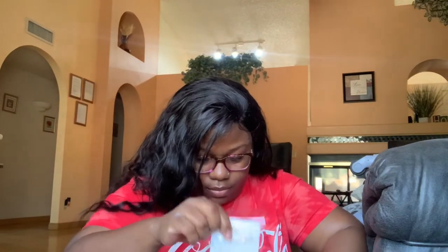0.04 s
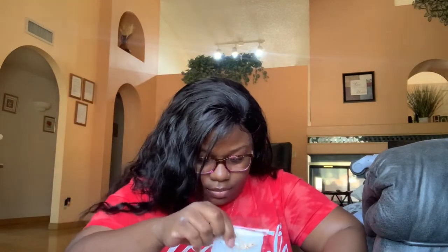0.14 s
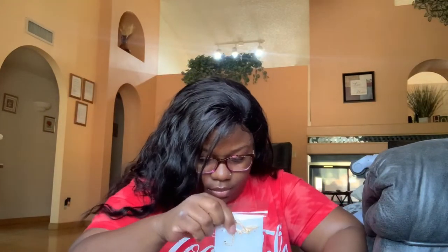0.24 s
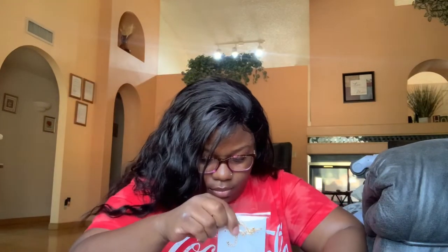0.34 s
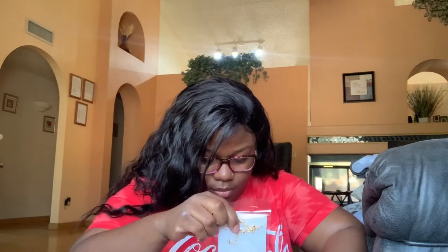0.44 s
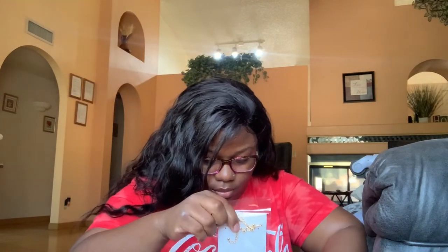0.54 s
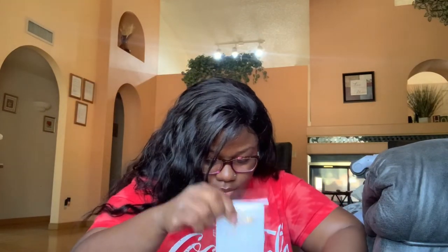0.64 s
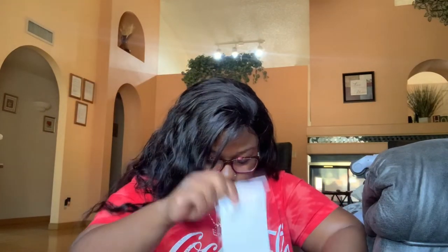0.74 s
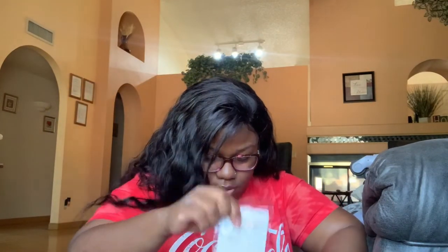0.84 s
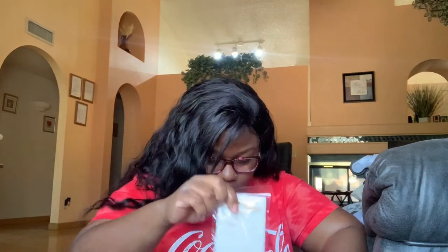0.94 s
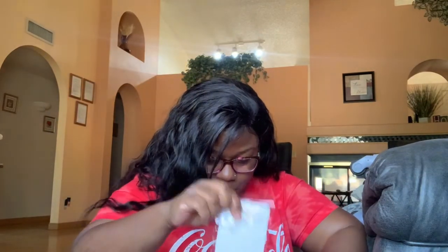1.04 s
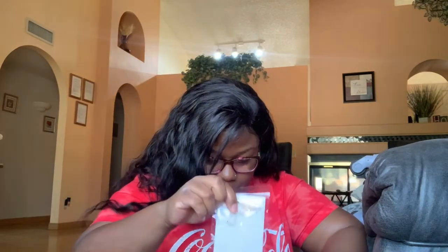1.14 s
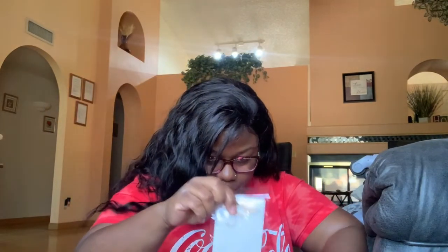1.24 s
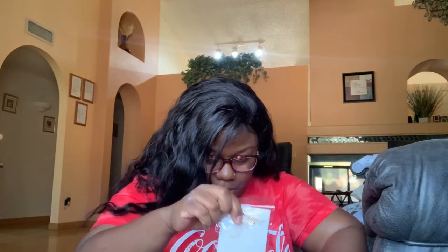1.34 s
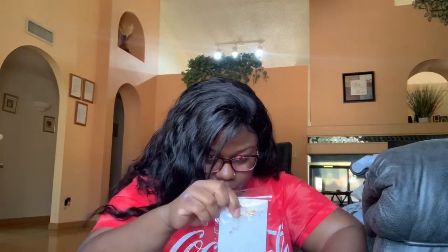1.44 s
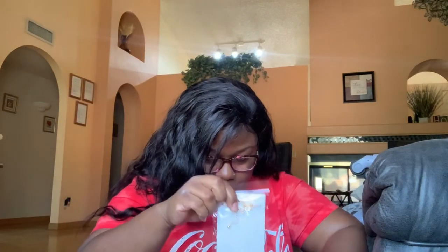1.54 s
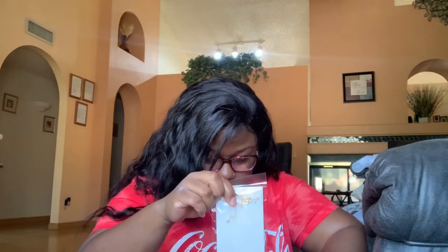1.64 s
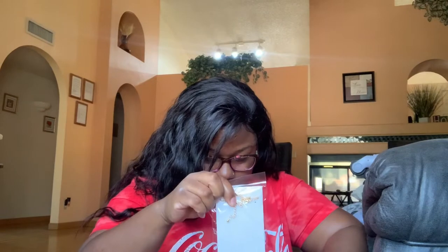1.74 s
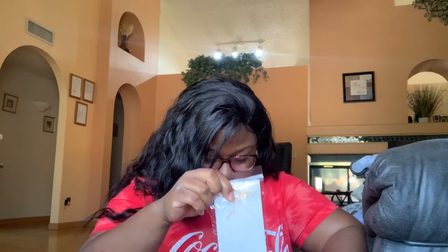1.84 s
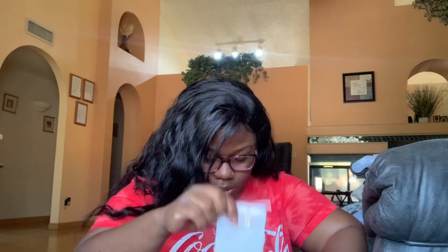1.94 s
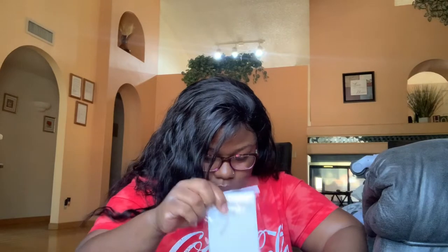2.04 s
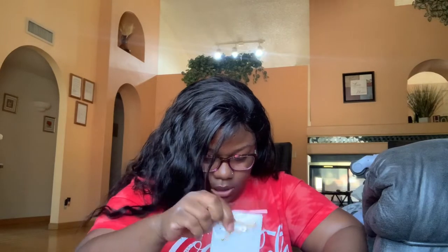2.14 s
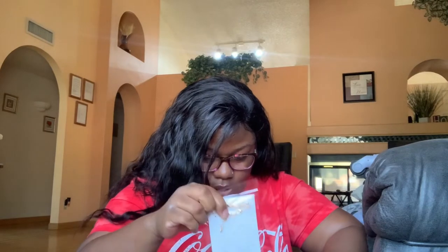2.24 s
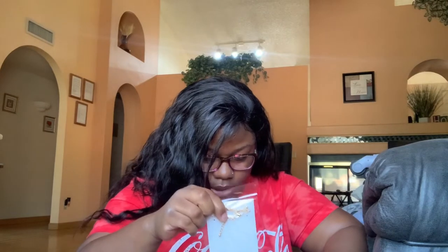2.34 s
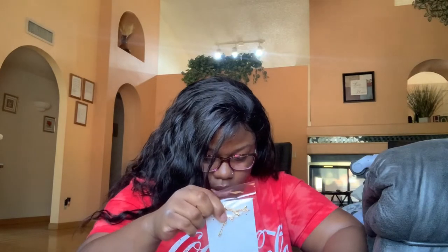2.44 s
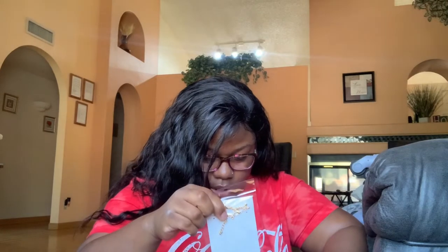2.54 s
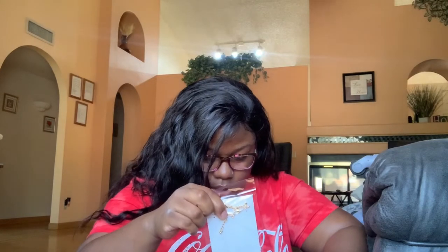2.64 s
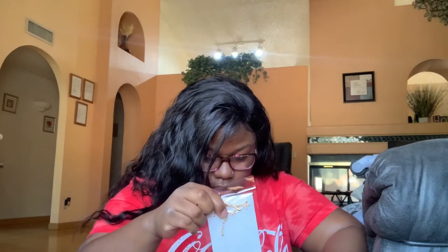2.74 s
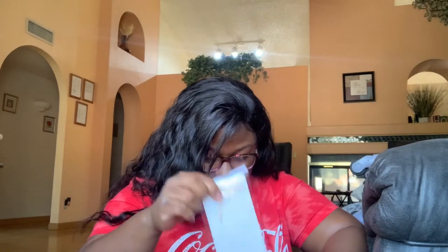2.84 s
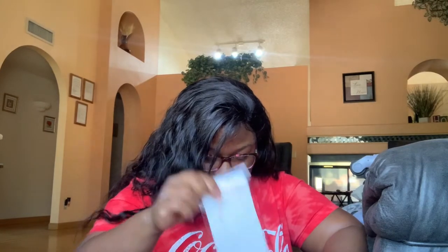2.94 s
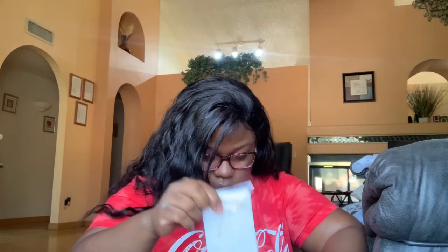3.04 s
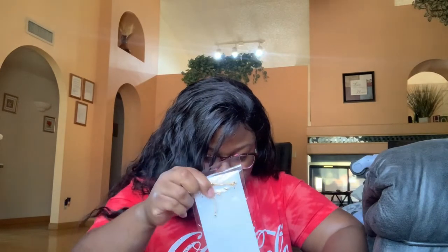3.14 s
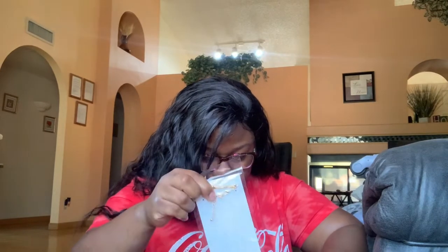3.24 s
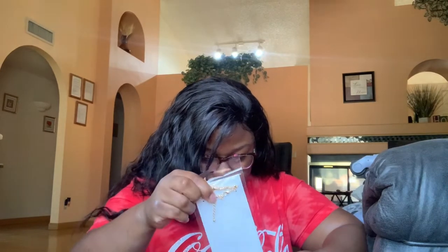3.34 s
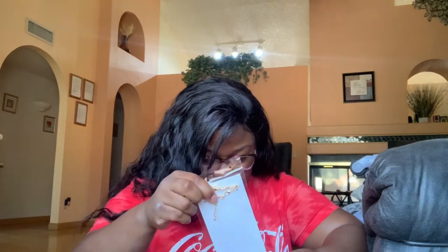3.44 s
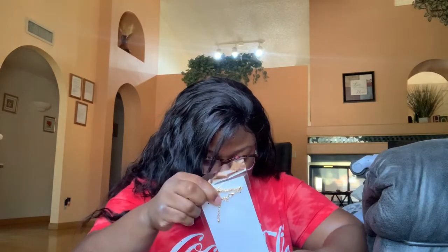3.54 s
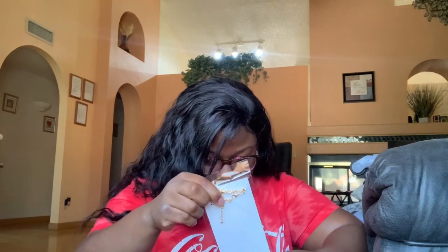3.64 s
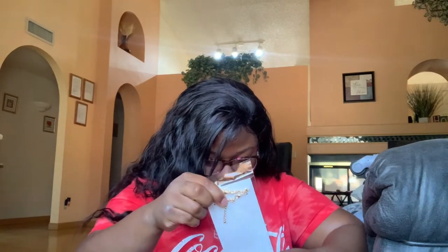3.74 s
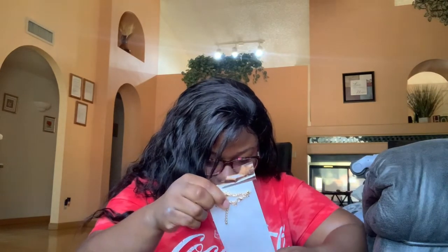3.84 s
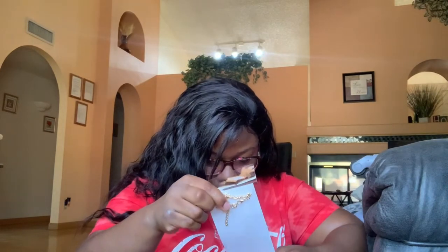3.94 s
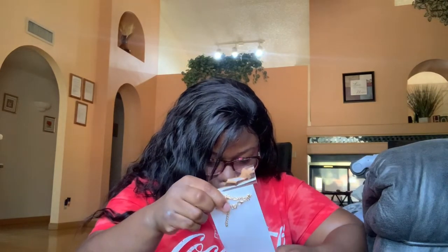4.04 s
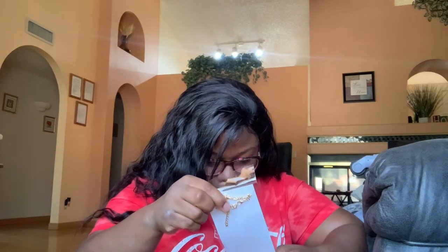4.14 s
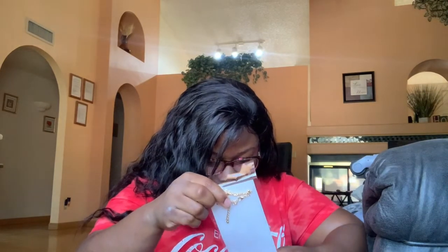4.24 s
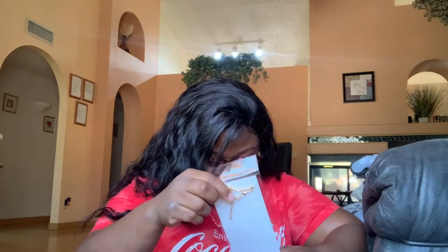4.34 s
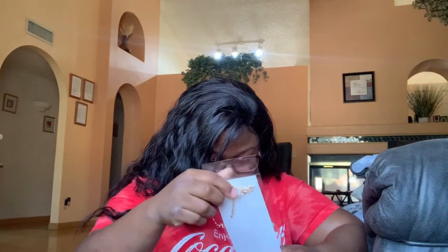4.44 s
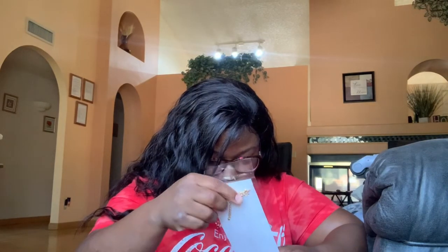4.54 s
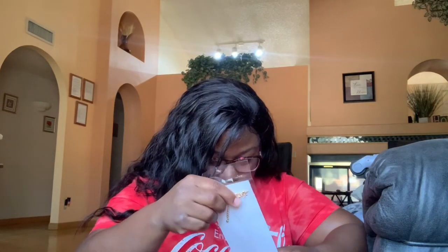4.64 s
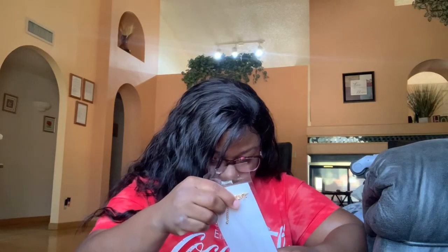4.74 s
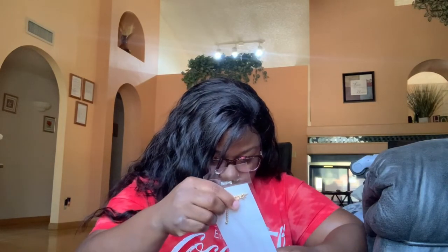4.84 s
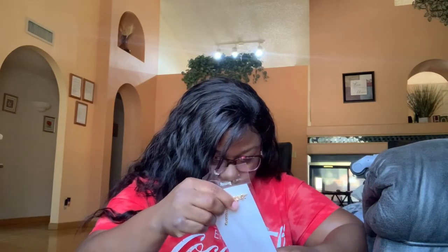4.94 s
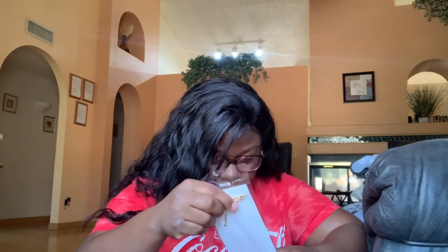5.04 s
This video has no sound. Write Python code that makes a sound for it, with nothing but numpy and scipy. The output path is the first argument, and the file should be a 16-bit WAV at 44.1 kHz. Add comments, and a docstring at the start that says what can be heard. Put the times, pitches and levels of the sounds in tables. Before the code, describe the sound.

A small plastic bag crinkles and snaps in quick close bursts, with soft card knocks and faint metallic clinks, in a live room.

```python
"""Jewellery bag in the hand

Hands work a small plastic bag with a jewellery card in it, close to a phone in a tall living room.
The film slides and buckles in sprays of tiny clicks, single creases snap as sharp noise bursts,
the card creaks and knocks as resonant noise, and the jewellery clinks as short wavering tones.
The room rings on behind each burst, over moving air and the hum of an appliance."""
import sys
import numpy as np
from scipy import signal
from scipy.fft import rfft, irfft
from scipy.io import wavfile
from scipy.ndimage import uniform_filter1d

SR = 44100
rng = np.random.default_rng(int(sys.argv[2]) if len(sys.argv) > 2 else 0)


def digitize_waveform(pressure):
    """Quantize a signal to 16-bit integers and store it at the path in sys.argv[1].

    Rows of a 2-D input are taken as channels; values are limited to [-1, 1].
    """
    field = np.atleast_2d(pressure).T
    bounded = np.clip(field, -1, 1)
    quanta = np.round(bounded * 32767).astype(np.int16)
    wavfile.write(sys.argv[1], SR, quanta)


N = 224588
TOP_HZ = 15900  # the treble is cut above this
TIME = np.arange(N) / SR
SIZE = 2 ** 19  # transform length, samples
FREQ = np.arange(SIZE // 2 + 1) * SR / SIZE


def undb(db):
    """Amplitude factor of a level in dB."""
    return 10 ** (np.asarray(db) / 20)


def unit(x):
    """Scale to rms 1."""
    return x / np.sqrt(np.mean(x ** 2))


def add(track, s, sound):
    """Mix a sound into a track at time s."""
    i = max(int(s * SR), 0)
    track[i:i + len(sound)] += sound[:max(N - i, 0)]


def apply(x, response):
    """Filter by a frequency response."""
    return irfft(rfft(x, SIZE) * response)[..., :N]


def colour(points):
    """Causal (minimum-phase) response through (Hz, dB) points that keeps the power of white noise."""
    hz, db = np.transpose(points)
    curve_db = np.interp(np.log(FREQ + 1), np.log(hz + 1), db)
    cepstrum = irfft(np.log(undb(curve_db)))
    magnitude = unit(np.abs(np.exp(rfft(cepstrum))))
    phase = rfft(2 * cepstrum[:SIZE // 2], SIZE).imag
    return magnitude * np.exp(1j * phase)


def walk(rate, size=2048):
    """Slow chance of rms 1: random levels, rate a second, joined by straight lines."""
    return unit(np.interp(TIME * rate, np.arange(size), rng.standard_normal(size)))


def decaying(kicks, decay_s):
    """Each kick dies away exponentially and adds to what is left of the earlier ones."""
    return signal.lfilter([1], [1, -np.exp(-1 / (decay_s * SR))], kicks)


def spaced(pair, corner_hz, side_db=1.5):
    """Stereo width by band: near mono in the bass, wide in the middle, near mono in the treble."""
    side = signal.sosfilt(signal.butter(1, corner_hz, "high", fs=SR, output="sos"), pair[1])
    side = signal.sosfilt(signal.butter(4, 6500, fs=SR, output="sos"), side) * undb(side_db)
    return np.array([pair[0] + side, pair[0] - side]) * 0.73


def background(air_db=-50.5):
    """Moving air is coloured noise; the appliance hums in tones of slightly wavering level and phase."""
    # colour of the air in the room: f/Hz, relative level/dB
    air_colour = [(32, -22), (43, 4), (120, -4.5), (380, -10), (620, -6), (900, -11.5), (1700, -19.5),
                  (6000, -29), (9000, -44), (16000, -59)]
    # tones of the appliance: f/Hz, level/dB
    hum_tones = [(48, -64), (393, -65.5), (590, -58.5)]
    air = apply(spaced(rng.standard_normal((2, N)), corner_hz=254), colour(air_colour))
    hum = 0
    for hz, db in hum_tones:
        waver_db = 2.5 * walk(14)
        drift = .9 * walk(16)  # radians
        tone = np.sqrt(2) * np.sin(2 * np.pi * hz * TIME + drift)
        hum = hum + undb(db + waver_db) * tone
    return undb(air_db) * unit(air) + hum


def room(x, early_db=-5.5, early_s=0.0072, tail_db=-10.5, treble_db=-4, t60_low=1.0, t60_high=0.23, count=16):
    """Table and body reflect almost at once; the tall room follows with a tail whose treble dies first."""
    t, reflections = TIME[:SR], 0
    band_of = np.arange(SR // 2 + 1) * count // TOP_HZ
    white = rfft(rng.standard_normal((2, SR)))
    for k in range(count):
        height = (k + .5) / count  # 0 in the bass, 1 at the top
        t60 = t60_low * (t60_high / t60_low) ** height
        early = unit(np.exp(-t / early_s) * (t > .001)) * undb(early_db)
        tail = unit(np.exp(-np.log(1000) * t / t60)) * undb(tail_db + treble_db * height)
        band = irfft(white * (band_of == k))
        reflections = reflections + band * np.hypot(early, tail) / np.sqrt(SR)
    return apply(x, rfft(spaced(reflections, corner_hz=125.5), SIZE))


def moving_room(x, count=4):
    """The bag turns and shifts in the hand, so its pattern of reflections keeps changing."""
    turns_per_s = 14
    shares = np.array([walk(turns_per_s) for _ in range(count)])
    shares = shares / np.linalg.norm(shares, axis=0)  # the total power stays even
    return sum(room(x * share) for share in shares)


def clinks(waver=0.075):
    """Small metal parts ring briefly, damped and unsteadied by the film that touches them."""
    # clinks of the jewellery: t/s, f/Hz, relative level/dB, t60/s
    clink_list = [(0.021, 3010, 1.5, 0.026), (0.1445, 8550, 1.5, 0.054), (3.4268, 6620, -16, 0.0058),
                  (4.923, 6630, -22, 0.0087)]
    out, t = np.zeros(N), TIME[:6000]
    for s, hz, db, t60 in clink_list:
        slip, touch = rng.standard_normal((2, len(t)))
        phase = 2 * np.pi * hz * t + waver * np.cumsum(slip)
        strength = undb(db + 4.2 * unit(uniform_filter1d(touch, size=80)))
        add(out, s, strength * np.sin(phase) * np.exp(-np.log(1000) * t / t60))
    return out


def bumps(bump_s=0.0047, hollow_hz=1350, body_q=1.48, hollow_q=1.68):
    """A finger meets the card, which answers with a low knock and a hollow note."""
    # fingers on the card: t/s, knock level/dB, knock f/Hz, hollow note level/dB (relative to the push)
    bump_list = [(0.003, -21, 594, -30), (0.204, -22.5, 490, -27), (0.434, -31.5, 460, -40),
                 (0.597, -30, 500, -31.5), (0.748, -15, 470, -31), (0.766, -18.5, 392, -25),
                 (0.86, -15.5, 477, -12), (1.023, -24.5, 550, -19.5), (1.161, -21, 550, -23.5),
                 (1.343, -21.5, 486, -30), (1.979, -18, 463, -14), (2.007, -19, 540, -15.5),
                 (2.334, -22, 574, -23.5), (2.388, -23.5, 494, -32), (2.609, -28.5, 513, -35.5),
                 (2.879, -20, 454, -22), (3.013, -20.5, 490, -15), (3.047, -20, 494, -21.5),
                 (3.172, -24.5, 398, -46), (3.187, -23, 495, -27), (3.223, -21, 510, -20.5),
                 (3.298, -26, 483, -35), (3.526, -26, 443, -24), (3.603, -38, 530, -34.5),
                 (4.072, -35.5, 590, -46)]
    out, t = np.zeros(N), TIME[:4096]
    push = np.exp(-t / bump_s) * (1 - np.exp(-t / 0.00087))
    for s, body_db, body_hz, hollow_db in bump_list:
        for hz, q, db in [(body_hz, body_q, body_db), (hollow_hz, hollow_q, hollow_db)]:
            mode = signal.iirpeak(hz, q, fs=SR)
            ring = signal.lfilter(*mode, push * rng.standard_normal(len(t)))
            ring = signal.lfilter(*mode, ring)
            add(out, s, undb(db) * unit(ring) * np.sqrt(np.mean(push ** 2)))
    return out


def handling():
    """Crinkle level in dB: each stroke takes hold, eases and lets go; overlapping strokes add in power."""
    # strokes of the hand on the bag: start t/s, length/s, crinkle level/dB
    stroke_list = [(-0.01, 0.22, -20.5), (0.264, 0.016, -32), (0.31, 0.095, -42.5), (0.448, 0.013, -28.5),
                   (0.527, 0.044, -44), (0.696, 0.13, -17.5), (0.761, 0.029, -15.5), (0.839, 0.012, -11.5),
                   (0.902, 0.28, -20.5), (1.199, 0.19, -26), (1.43, 0.1, -40), (1.551, 0.028, -34.5),
                   (1.653, 0.036, -42), (1.758, 0.01, -45.5), (1.867, 0.024, -34), (1.901, 0.097, -20),
                   (1.943, 0.054, -17), (2.029, 0.16, -18.5), (2.234, 0.19, -28), (2.476, 0.078, -46),
                   (2.58, 0.087, -37), (2.862, 0.309, -23), (2.967, 0.044, -17), (3.002, 0.038, -14.5),
                   (3.221, 0.02, -15), (3.25, 0.18, -40.5), (3.52, 0.12, -43.5), (3.768, 0.086, -40.5),
                   (4.27, 0.37, -36.5), (4.377, 0.036, -28.5), (4.553, 0.032, -32), (4.945, 0.0051, -37.5)]
    attack_s, ease_db_per_s, release_s = 0.0095, 11, 0.02
    touch_db, touch_s = -6.5, 0.015  # the fingers stir the film as they close on it
    power = 1e-9
    for s, length_s, db in stroke_list:
        before = np.maximum(s - TIME, 0)
        held = np.clip(TIME - s, 0, length_s)
        after = np.maximum(TIME - s - length_s, 0)
        touch = undb(touch_db) * np.exp(-before / touch_s)
        grip = np.clip(held / attack_s, touch, 1)
        stroke = undb(db - ease_db_per_s * held) * grip * np.exp(-after / release_s)
        power = power + stroke ** 2
    return 10 * np.log10(power)


def crackle(rate, spread_db, ring_s, patchy_db, count=10):
    """Tiny buckles of uneven size; each rings its own patch of material, so band levels change with each."""
    sizes = (rng.random(N) < rate / SR) * undb(spread_db * np.minimum(rng.exponential(size=N), 3))
    energy = decaying(sizes ** 2 + 1e-12, ring_s)
    latest = np.maximum.accumulate(np.arange(N) * (sizes > 0))  # sample of the last buckle
    edges = TOP_HZ * np.linspace(0, 1, count + 1) ** 1.5
    noise, out = rfft(rng.standard_normal(SIZE // 2)), 0
    for lo, hi in zip(edges, edges[1:]):
        band = irfft(noise * ((FREQ[::2] >= lo) & (FREQ[::2] < hi)))[:N]
        out = out + band * undb(patchy_db * rng.standard_normal(N)[latest])
    out = out * np.sqrt(energy)
    # the hand sets the mean power, however the buckles fall
    return out / np.sqrt(uniform_filter1d(out ** 2, size=1000) + 1e-12)


def card(level_db):
    """The card bends with the bag and creaks dully, up to the most it gives."""
    firm_db, slope = -20.5, 0.81  # a firm stroke; dB of creak for each dB of crinkle
    flex_db = np.minimum(-31.5 + slope * (level_db - firm_db), -19.5)
    return crackle(400, spread_db=1.5, ring_s=0.0016, patchy_db=2.5) * undb(flex_db - 1.0)


def flurries(rate=170, spread_db=5.5, decay_s=0.0033, steady=1.0):
    """One buckle trips its neighbours: a strength that leaps at random and dies in a few milliseconds."""
    kicks = (rng.random(N) < rate / SR) * undb(spread_db * np.minimum(rng.exponential(size=N), 2))
    power = steady + decaying(kicks ** 2, decay_s)
    return np.sqrt(power / uniform_filter1d(power, size=1800))


def rub(level_db, rub_hz=4300, rub_db=-7.0, light_db=-32):
    """Fingertips graze the film with a narrow hiss that grows no further once they grip."""
    hiss = signal.lfilter(*signal.iirpeak(rub_hz, 3.5, fs=SR), rng.standard_normal(N))
    return unit(hiss) * flurries() * undb(np.minimum(level_db, light_db) + rub_db)


def crinkle(level_db):
    """Harder handling buckles more creases a second, in quick flurries, over the hiss of film on film."""
    rate = 1400 * undb(.42 * (level_db + 19.5))  # buckles a second
    buckles = crackle(rate, spread_db=-0.5, ring_s=0.00046, patchy_db=2.5)
    slide = rng.standard_normal(N)
    return (undb(0.46) * buckles + undb(-4) * slide) * flurries() * undb(level_db)


def snaps(crack_db=0.0, crack_s=0.00066, spray_db=2.5, uneven_db=6, hinge_hz=8500,
          swell_db=-11.5, swell_s=0.0014):
    """Each snap swells for about a millisecond, cracks sharply and dies in an uneven spray."""
    # creases that snap through: t/s, relative level/dB, brightness/dB (10 dB leaves the burst untilted)
    snap_list = [(0.0202, -4.5, 14), (0.075, -18, 17), (0.114, -19, 17), (0.1433, -10, 13.5),
                 (0.371, -34.5, 1), (0.473, -23, 13), (0.5995, -28.5, -1), (0.615, -25.5, 5),
                 (0.626, -27.5, 1), (0.682, -29, -8), (0.839, -1.5, 6), (0.8512, -6, 14),
                 (1.0598, -14.5, 17), (1.086, -9.5, 15.5), (1.122, -22, 18), (1.139, -14, 6),
                 (1.222, -10, 12), (1.385, -18, 10), (1.4338, -20, 13), (1.786, -31, 1), (1.812, -39.5, -1),
                 (1.833, -35, 3), (1.8983, -20.5, 3.5), (1.956, -14.5, 11), (1.982, -16, 16),
                 (2.007, -14.5, -17), (2.143, -5, 17), (2.188, -10.5, 15.5), (2.223, -15, 15),
                 (2.3164, -16.5, 8), (2.357, -18, 8.5), (2.6848, -26, 4), (2.861, -16, 10),
                 (2.937, -7.5, 8.5), (2.973, -6.5, 4.5), (3.011, -9.5, -16), (3.2089, -19.5, 14),
                 (3.2977, -18, 7), (3.3714, -7.5, 30), (3.397, -34, 5), (3.5022, -28, 5),
                 (3.601, -19.5, 19.5), (3.652, -31.5, -3), (3.75, -29.5, 4.5), (3.764, -18, 24),
                 (3.7816, -26.5, 8.5), (3.823, -32, 1), (3.896, -23.5, 13), (4.015, -42, -3.5),
                 (4.023, -24.5, 17), (4.07, -28, 6), (4.086, -32.5, -7), (4.263, -29.5, -9), (4.28, -25, 4),
                 (4.289, -21.5, 15), (4.32, -19.5, 20), (4.332, -25, 9), (4.372, -16, 24), (4.435, -21, 15),
                 (4.491, -15, 16), (4.5412, -22, 22), (4.583, -17, 14.5), (4.603, -19.5, 4),
                 (4.6448, -22, 16), (4.698, -24.5, 14), (4.875, -41.5, 8), (4.9232, -15, 30),
                 (4.971, -30, 9)]
    # a tight crease is brighter and over sooner: decay at brightness 0, brightness that halves it
    plain_decay_s, halving_db = 0.0042, 13
    lead_s = 0.015  # time kept for the swell
    out, t = np.zeros(N), TIME[:4096] - lead_s
    hz = np.arange(len(t) // 2 + 1) * SR / len(t)
    for s, db, bright_db in snap_list:
        noise, uneven = rng.standard_normal((2, len(t)))
        decay_s = plain_decay_s * 2 ** (-bright_db / halving_db)
        swell = undb(swell_db) * np.exp(-abs(t) / swell_s)
        fade = np.where(t < 0, swell, np.exp(-abs(t) / decay_s))
        ragged = undb(uneven_db * unit(uniform_filter1d(uneven, size=30)))
        spray = unit(fade * ragged) * np.sqrt(np.mean(fade ** 2))
        crack = (t >= 0) * np.exp(-abs(t) / crack_s)
        burst = noise * (undb(crack_db) * crack + undb(spray_db) * spray)
        tilt = unit(undb((bright_db - 10.0) * np.tanh(2 * np.log((hz + 1) / hinge_hz)) / 2))
        add(out, s - lead_s, undb(db) * irfft(rfft(burst) * tilt))
    return out


def folds(x, count=18):
    """The folds keep changing shape, so the film rings at other pitches from one crackle to the next."""
    shifts_per_s, depth_db = 35, 2.3
    place = np.minimum(np.sqrt(FREQ[::2] / TOP_HZ), 1) * (count - 1)
    gains = undb(depth_db * np.array([walk(shifts_per_s) for _ in range(count)]))
    gains = gains / np.sqrt(np.mean(gains ** 2, axis=0))
    spectrum, out = rfft(x, SIZE // 2), 0
    for k, gain in enumerate(gains):
        band = irfft(spectrum * np.maximum(1 - abs(place - k), 0))[:N]  # overlapping triangles
        out = out + gain * band
    return out


def scene(left_db=-1.2, right_db=0, clink_room_db=-9):
    """Bag, card and jewellery reach the phone directly and by way of the room."""
    # colours of the plastic film and of the card: f/Hz, relative level/dB
    film_colour = [(700, -22), (1500, -12), (2050, -7.5), (2400, -10), (2950, -.6), (4200, -2.5),
                   (5400, -2.5), (6600, 0), (10500, -.5), (11600, -3.3), (15500, -8.8)]
    card_colour = [(60, -13.5), (180, -12.5), (330, -7.5), (520, -1.5), (660, -1.5), (790, -12.5),
                   (980, -2.5), (1100, -6.5), (1380, -4), (1800, -5.5), (2600, -0.5), (6000, -60)]
    # phase between left and right for the handling sounds: f/Hz, lead of the left/rad
    phase_lead = [(0, 0), (750, -1.1), (1300, .3), (1800, -1.5), (3600, -3.0), (4700, -4.5), (5400, -3.5),
                  (6500, -4.9), (8400, -3.25), (9600, -3.05), (13200, -.1), (16000, .1)]
    level_db = handling()
    film = apply(crinkle(level_db) + rub(level_db) + snaps(), colour(film_colour))
    creaks = apply(card(level_db), colour(card_colour))
    bag = folds(film + creaks) + bumps()
    metal = clinks()
    heard = bag + metal + moving_room(bag + undb(clink_room_db) * metal)
    lead = np.exp(.5j * np.interp(FREQ, *np.transpose(phase_lead)))
    stereo = apply(heard, np.array([lead, lead.conj()])) * undb([[left_db], [right_db]])
    return stereo + background()


def record(dry):
    """The phone flattens the tallest peaks and cuts the top."""
    return signal.sosfilt(signal.ellip(10, .2, 70, TOP_HZ, fs=SR, output="sos"), np.clip(dry, -1, 1))


dry = scene()
out = record(dry)
digitize_waveform(out)
```